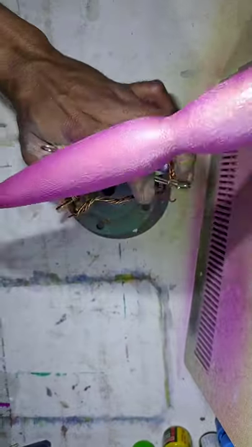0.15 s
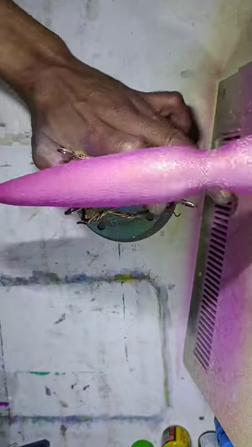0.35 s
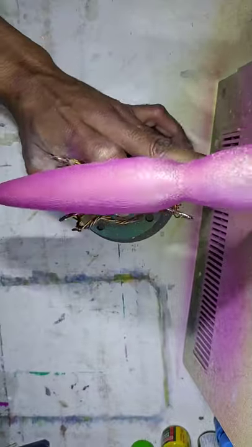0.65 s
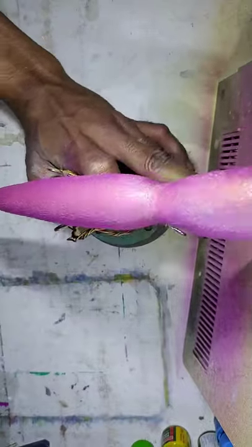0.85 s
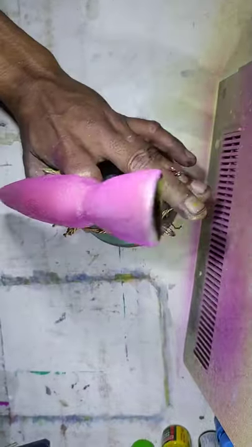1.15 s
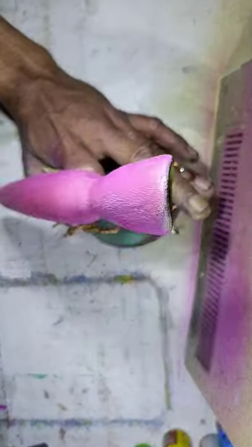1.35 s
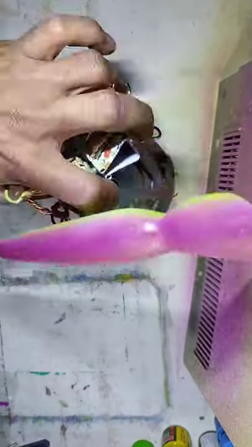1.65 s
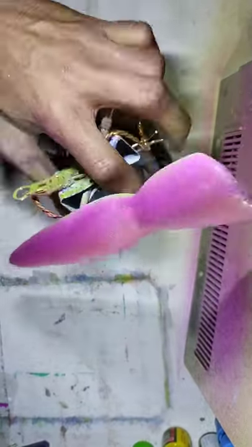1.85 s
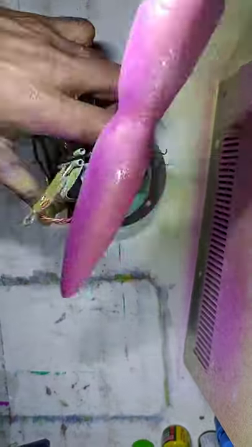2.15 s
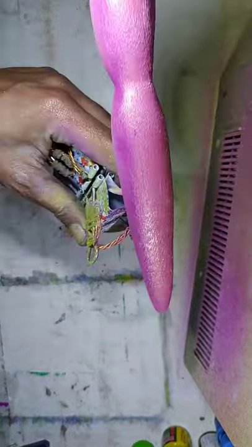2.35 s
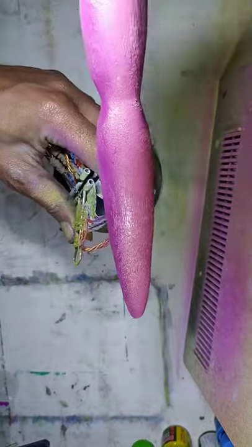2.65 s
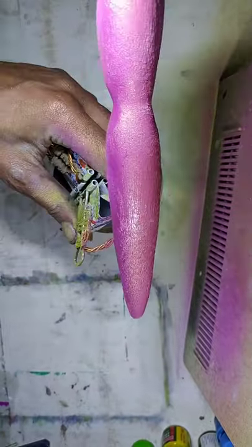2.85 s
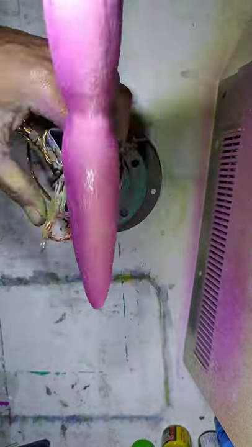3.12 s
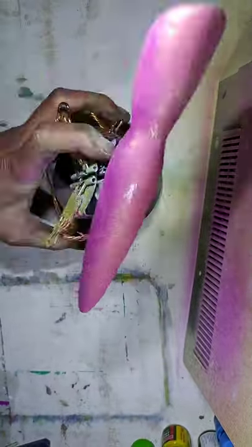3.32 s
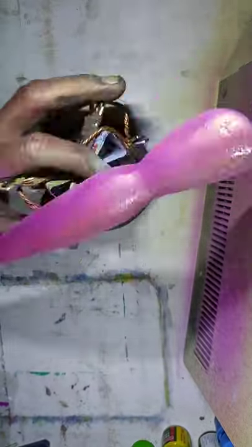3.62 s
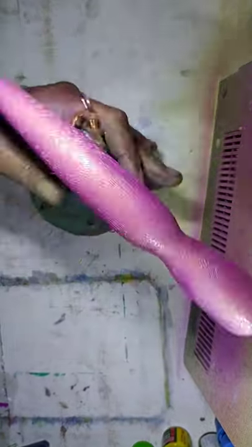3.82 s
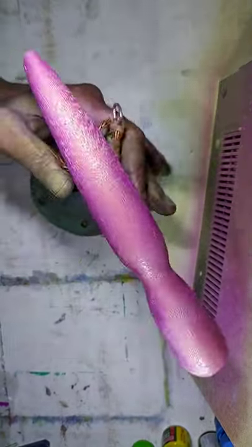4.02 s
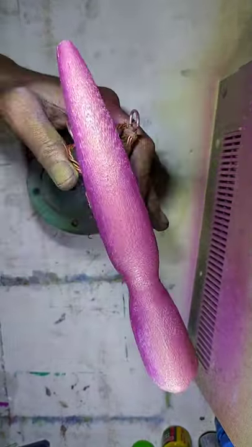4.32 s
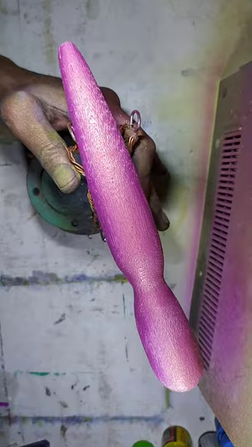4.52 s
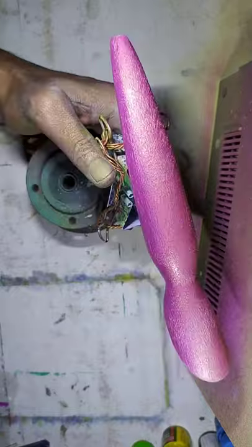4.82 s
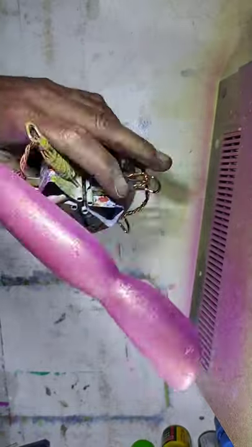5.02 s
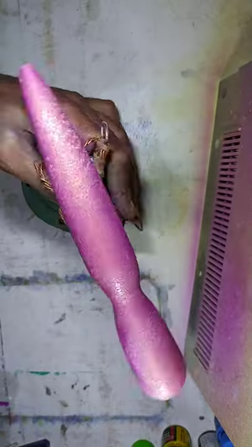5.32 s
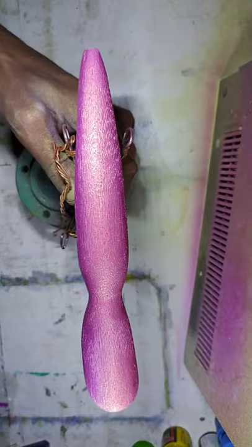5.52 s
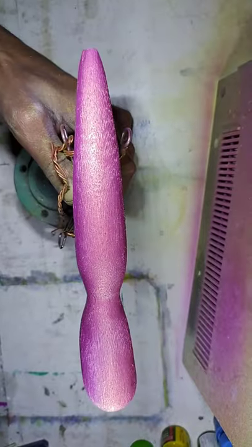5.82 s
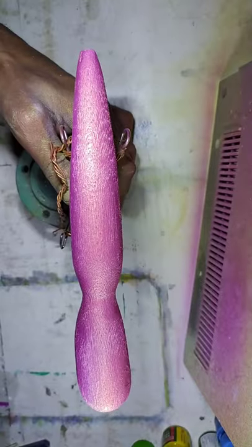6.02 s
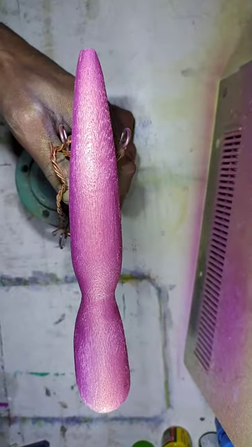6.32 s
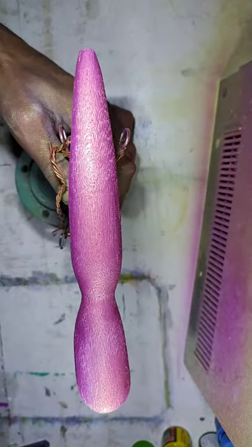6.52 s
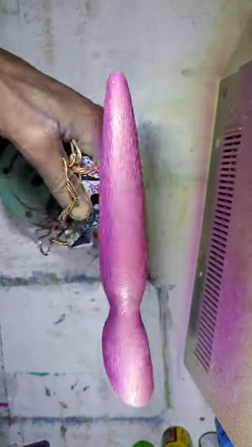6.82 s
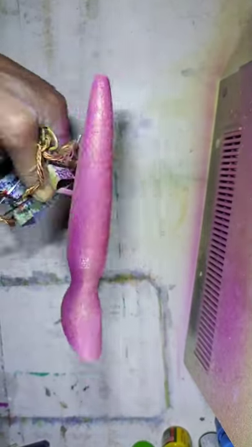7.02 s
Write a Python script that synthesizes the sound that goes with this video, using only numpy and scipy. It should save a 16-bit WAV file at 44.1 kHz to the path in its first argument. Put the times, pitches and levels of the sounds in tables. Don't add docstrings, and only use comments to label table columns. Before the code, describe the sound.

Bright bursts of spraying paint hiss near the left, above hurried compressor thuds and fan noise, then stop as a stand keeps scraping on the bench.

```python
import sys
import numpy as np
from scipy import signal
from scipy.fft import rfft, irfft, next_fast_len
from scipy.io import wavfile
from scipy.ndimage import uniform_filter1d

SR = 44100
rng = np.random.default_rng(int(sys.argv[2]) if len(sys.argv) > 2 else 0)


def voltage_ratio(level):
    return 10 ** (np.asarray(level, float) / 20)


def wrap_up_sound(samples):
    columns = np.atleast_2d(samples).T
    tamed = np.clip(columns, -1, 1)
    steps = np.round(tamed * 32767).astype(np.int16)
    wavfile.write(sys.argv[1], SR, steps)


N = 315756

CYCLE_S, STROKE_S, VALVE_S = .08571, 0, .0664
PORT_LAG = 16
# frequency in Hz, left minus right in dB.
ROOM_BALANCE = [(60, 0.5), (200, -1.5), (700, 1.5), (1300, 2.5), (2400, 0.5), (4400, 3), (9500, 22),
                (15000, 76)]


def shape(x, points):
    hz, db = np.transpose(points)
    size = next_fast_len(x.shape[-1], real=True)
    bins_hz = np.arange(size // 2 + 1) * SR / size
    gain = voltage_ratio(np.interp(np.log(bins_hz + 1), np.log(hz), db))
    return irfft(rfft(x, size) * gain, size)[..., :x.shape[-1]]


def level(x, db):
    return x * voltage_ratio(db) / np.sqrt(np.mean(np.atleast_2d(x).mean(axis=0) ** 2))


def walk(rate):
    hold = int(SR / rate)
    steps = np.repeat(rng.standard_normal(N // hold + 1), hold)
    return 1.923 * uniform_filter1d(uniform_filter1d(steps, hold), hold)[:N]


def ports(x, balance):
    hz, db = np.transpose(balance)
    return np.array([x[0], shape(x[1], np.transpose([hz, -db]))])


def ring(hz, t60, length):
    t = np.arange(int(length * SR)) / SR
    return np.sin(2 * np.pi * hz * t) * np.exp(-np.log(1000) * t / t60)


def add(out, s, x):
    i = max(int(s * SR), 0)
    out[:, i:i + x.shape[-1]] += x[..., :N - i]


def air(points, alike_hz, sway_db, flicker_db):
    shared, *own = rng.standard_normal((3, N))
    share = [(alike_hz / 4, 0), (alike_hz, -3), (4 * alike_hz, -24)]
    apart = [(alike_hz / 16, -7), (alike_hz, -3), (2 * alike_hz, 0)]
    x = shape(np.array([np.roll(shared, PORT_LAG), shared]), share) + shape(np.array(own), apart)
    size = next_fast_len(N, real=True)
    bins_hz = np.arange(size // 2 + 1) * SR / size + 1
    spectrum = rfft(shape(x, points), size)
    out, sway = 0, walk(2.62)
    centres = 30 * 2. ** np.arange(10)
    for hz in centres[centres > points[0][0] / 2]:
        weight = np.clip(1 - abs(np.log2(bins_hz / hz)), 0, 1)
        band = irfft(spectrum * weight, size)[:, :N]
        out = out + band * voltage_ratio(sway_db * sway + flicker_db * walk(40))
    return out


def dropouts(x, size=2048):
    # frequency in Hz, depth in dB.
    depths = [(700, 1), (1500, 5), (3000, 8), (5500, 8), (7500, 4), (9500, 2), (12000, 5), (15500, 7)]
    hz, _, cells = signal.stft(x, SR, nperseg=size)
    depth_db = np.interp(hz, *np.transpose(depths))[:, None]
    fine, wide = rng.standard_normal((2,) + cells.shape[-2:])
    wide = wide[::6, ::2].repeat(6, axis=0).repeat(2, axis=1)[:len(hz), :cells.shape[-1]]
    gain = voltage_ratio(depth_db * (1.1 * np.minimum(fine, .7) - 4 * np.clip(wide - 1.1, 0, 1)))
    gain = gain / np.sqrt(uniform_filter1d(np.mean(gain ** 2, axis=1), size=41))[:, None]
    return signal.istft(cells * gain, SR, nperseg=size)[1][..., :N]


def spray():
    # frequency in Hz, density in dB per Hz.
    jet_colour = [(2350, -24.5), (3500, -19), (4200, -16.5), (5320, -15), (6900, -8), (8100, -5.5),
                  (9170, 1), (10000, 1.5), (12100, -8), (15300, -14.5), (15900, -9)]
    # frequency in Hz, density in dB per Hz.
    wash_colour = [(120, -1), (250, 10), (500, 1), (900, -4.5), (1500, -7.5), (2700, -3.5), (4000, -7.5),
                   (6000, -1.5), (9000, -40)]
    # frequency in Hz, left minus right in dB.
    near_balance = [(300, 4.5), (1300, -2.5), (2400, 0.5), (4400, 4), (6500, 15), (9500, 25), (12000, 105),
                    (16000, 64)]
    # opens, fullest and let go in seconds, fullest and last level in dB.
    pulls = [
        (-.1, .05, .097, -28.5, -28.5),
        (.74, 1.0, 1.187, -27, -28.5),
        (1.231, 1.368, 1.446, -27.5, -28.5),
        (2.424, 2.457, 2.75, -28.5, -32.5),
        (2.879, 3.016, 3.024, -28, -29),
        (3.932, 4.19, 4.204, -26.5, -27.5),
        (4.246, 4.272, 4.533, -26, -33),
        (4.551, 4.706, 4.718, -26.5, -27),
        (4.747, 4.785, 4.9, -30, -36.5),
    ]
    # leak in seconds, leak in dB, attack and drop in seconds.
    valves = [
        (.004, -48, .013, .016),
        (.004, -47, .013, .017),
        (.014, -47, .012, .016),
        (.002, -50, .014, .016),
        (.013, -46, .014, .016),
        (.003, -48, .012, .018),
        (.012, -43, .015, .016),
        (.004, -49, .012, .011),
        (.002, -57, .003, .016),
    ]
    # time in seconds, wash level in dB.
    aim = [(0, -39), (.8, -47.5), (.975, -39.5), (1.05, -43), (1.2, -43.5), (1.45, -46), (2.5, -50),
           (2.74, -42.5), (2.9, -47.5), (4.0, -51), (4.3, -44.5), (4.6, -47.5), (4.9, -46.5)]
    seep_s, seep_db, open_db = .008, -62, -33
    early_share, early_gain_share = .25, .45
    dribble_db, shut_db, shut_s, wash_release_s = -24, -33, .008, .028

    t, jet_gain, flowing = np.arange(N) / SR, 0, 0
    for (on, full, off, full_db, last_db), (leak, leak_db, attack, drop) in zip(pulls, valves):
        early = on + attack + early_share * (full - on - attack)
        early_db = open_db + early_gain_share * (full_db - open_db)
        times = [on - leak - seep_s, on - leak, on, on + attack, early,
                 full, off, off + drop, off + drop + shut_s]
        levels = [seep_db, leak_db, leak_db - 0.5, open_db, early_db,
                  full_db, last_db, last_db + dribble_db, last_db + shut_db]
        jet_gain = jet_gain + voltage_ratio(np.interp(t, times, levels, -120, -120))
        times = [on, on + attack, off, off + wash_release_s]
        flowing = flowing + voltage_ratio(np.interp(t, times, [-11.0, 0.0, 1, -13], -90, -90))
    wash_gain = flowing * voltage_ratio(np.interp(t, *np.transpose(aim)))
    sputter = voltage_ratio(0.4 * walk(300) + 0.6 * walk(80))
    jet, wash = dropouts(np.array([air(jet_colour, 300., 0.21, 0.87), air(wash_colour, 530.0, 0.72, 1.5)]))
    jet = level(ports(jet, near_balance), 0.095) * jet_gain * sputter
    wash = level(ports(wash, near_balance), 1.78) * wash_gain
    return jet + wash


def fan():
    # frequency in Hz, density in dB per Hz.
    rush = [(25, -4.5), (45, -7), (90, -12.5), (130, -9.5), (180, -5), (220, -8.5), (350, -7), (460, -12.5),
            (750, -11.5), (1000, -16.5), (1350, -14.5), (1600, -23), (2900, -26), (4100, -34.5),
            (4800, -30.5),
            (6500, -27.5), (9100, -26.0), (9550, -20.5), (10000, -23.0), (11500, -31.5),
           (13500, -42.0), (15800, -44.0)]
    # time in seconds, low drone in dB, high drone in dB.
    swells = [
        (0, -58, -48),
        (2.3, -56.5, -68),
        (3.7, -52.5, -58),
        (4.4, -60, -76),
        (5.4, -58, -53),
        (6.0, -50, -50.5),
        (6.8, -50.5, -43.5),
        (7.16, -48, -46),
    ]
    out = level(ports(dropouts(air(rush, 750.0, 0.15, 1.1)), ROOM_BALANCE), -47)
    s, *levels = np.transpose(swells)
    for hz, db in zip((91, 346), levels):
        drone = np.sin(2 * np.pi * np.cumsum(hz + 7 * walk(25)) / SR)
        out = out + drone * voltage_ratio(np.interp(np.arange(N) / SR, s, db) + 0.8 * walk(8.4))
    return out


def slices():
    # first stroke in seconds, gap, next gap and step back in ms (-1 is a hiccup).
    gait = [(.011, 55.8, 55.8, 16), (.2667, 71.8, 67.7, 16), (.72, 80.5, 68, 0), (1.177, 43, 94, 16),
            (1.383, 76, 43.5, 0), (1.653, 82, 69, -1), (1.874, 70, 88, -1), (2.0945, 55.5, 102, 16),
            (2.378, 81, 102, 16), (2.637, 64.6, 66.4, 0), (2.8236, 76, 91.5, 16), (3.05, 86, 55, 0),
            (3.191, 71.5, 71.5, 16), (3.426, 74.2, 74.2, 0), (3.6356, 94, 55.5, 0), (3.864, 100, 61, 0),
            (4.106, 90, 43, 0), (4.239, 78, 102, 14), (4.468, 71, 97, 16), (4.688, 84, 73, 0),
            (4.902, 71, 82.5, -1), (5.195, 75.5, 61, 12), (5.3315, 71.7, 71.7, 16), (5.573, 55, 71, 0),
            (5.785, 82, 70, -1), (6.004, 67, 86, 0), (6.243, 74, 55, 0), (6.4585, 61, 97.5, 12),
            (6.672, 75, 89, 0), (6.903, 87, 55, 0)]
    # stroke in seconds, step back in ms.
    stumbles = [(.339, 13), (.478, 1), (.72, -12), (1.314, 1), (1.383, 0), (1.502, 17), (2.378, 0),
                (2.561, -11), (2.637, -1), (2.702, 16), (2.9, 19), (2.991, 16), (3.785, 12), (4.106, -6),
                (4.239, 16), (4.317, 12), (4.636, -2), (4.688, -4), (4.772, 13), (5.271, -12), (5.475, 13),
                (5.628, 16), (5.937, 12), (6.004, 0), (6.519, 11)]
    # ms before the next stroke, place in the cycle in ms.
    hiccup = [
        (43, 52),
        (31.5, 23.5),
    ]
    hiccup_gap_ms = 68
    lead_ms, cut_ms, short_ms, closest_ms = 14.7, 16, 60, 40

    cycle_ms, end_ms, strokes = CYCLE_S * 1000, N / SR * 1000, []
    run_ends = [row[0] for row in gait[1:]] + [N / SR]
    for (s, *gaps, back), end in zip(gait, run_ends):
        times_ms = s * 1000 + np.cumsum([0] + gaps * 4)
        strokes += [(ms, back) for ms in times_ms if ms < end * 1000 - closest_ms]
    out = []
    for (ms, back), (after, _) in zip(strokes, strokes[1:] + [(end_ms, 0)]):
        gap = after - ms
        out.append((ms - lead_ms, cycle_ms - lead_ms))
        own = [step for s, step in stumbles if abs(s * 1000 - ms) < 2]
        if own:
            out.append((ms + cut_ms, cut_ms - own[0]))
        elif gap > short_ms and back > 0:
            out.append((ms + cut_ms, cut_ms - back))
        elif back < 0 and hiccup_gap_ms < gap < cycle_ms:
            out += [(after - before, place) for before, place in hiccup]
        elif short_ms < gap < cycle_ms:
            out.append((ms + cut_ms, cycle_ms - gap + cut_ms))
    return [(max(ms, 0) / 1000, place - min(ms, 0)) for ms, place in out]


def compressor(count=24):
    # frequency in Hz, t60 in seconds, signed swing left and right.
    casing = [(92, 0.23, 1, 1), (121, 0.13, 4.5, 3.5), (162.92, 0.38, -9, -8), (173.96, 0.21, 34, 37.5),
              (196, 0.26, 1, 0.5), (232.5, 0.51, 0, 7.5), (254.76, 0.28, -11, -22.5),
              (284.6, 0.26, -4.5, -17.5), (315, 0.12, -20.5, -21), (361.6, 0.4, -6.5, -5),
              (383.8, 0.14, -16.5, -11), (420, 0.51, -2, -1.5), (468, 0.022, -17, -30),
              (527.2, 0.12, 0, -8.5), (553.5, 0.095, -12, -13.5), (571, 0.095, -3.5, 2.5),
              (597.4, 0.48, -2.5, -2), (616.4, 0.12, -2, -1), (674, 0.11, 3, 3.5), (728, 0.038, 9, -2),
              (755.5, 0.085, -0.5, 6.5), (845, 0.55, 1.5, 2), (648, 0.019, -12, -9.5),
              (770, 0.031, -7, -6.5), (1160, .02, 4, 10.5)]
    # start in seconds, signed push, treble tilt as a power of frequency.
    blow_kinds = [
        (STROKE_S, 1, 0),
        (.0269, -.155, -.33),
        (VALVE_S, .39, -.33),
    ]
    rattle_colour = [(480, -21), (555, 19.5), (620, -9), (760, 2.0), (950, -10), (1350, 6.5),
                     (1550, 0.0), (2550, -11.5), (2900, 3.5), (3300, -20.0), (6000, -59)]

    size, t = int(count * CYCLE_S * SR), np.arange(int(.35 * SR)) / SR
    chance, thud, strokes = rng.standard_normal((count, 3)), 0, 0
    for k, (start, push, tilt) in enumerate(blow_kinds):
        blows = np.zeros(size)
        places = ((np.arange(count) * CYCLE_S + start) * SR).astype(int)
        blows[places] = push * voltage_ratio(0.35 * chance[:, k])
        body = 0
        for hz, t60, left, right in casing:
            build = 1 - np.exp(-t / .0021 * (hz / 300) ** .34)
            mode = ring(hz, t60, .35) * (hz / 300) ** tilt * build
            body = body + np.outer([left, right], mode)
        thud = thud + signal.fftconvolve(blows[None], body * voltage_ratio(-60.0), axes=1)[:, :size]
        strokes = strokes + abs(blows)

    shake = np.exp(-t / 0.041) * (1 - np.exp(-t / 0.0031))
    gate = 0.15 + signal.fftconvolve(strokes, shake)[:size]
    bursts_db = 6.5 * rng.standard_normal(size // 200 + 1).repeat(200)[:size]
    grit = rng.standard_normal(size) * voltage_ratio(bursts_db)
    run = thud + level(gate * shape(grit, rattle_colour), -58.5)
    run[0] = np.roll(run[0], PORT_LAG)

    out, fade = np.zeros((2, N)), int(0.0041 * SR)
    cuts = slices()
    ends = [s for s, _ in cuts[1:]] + [N / SR]
    for k, ((s, ms), end) in enumerate(zip(cuts, ends)):
        length = int(end * SR) - int(s * SR) + fade
        i = int(((4 + k % (count - 8)) * CYCLE_S + ms / 1000) * SR)
        edge = np.clip(np.minimum(np.arange(length), length - np.arange(length)) / fade, 0, 1)
        add(out, s, run[:, i:i + length] * edge)
    return out


def scrapes():
    # time in seconds, length in seconds, ring in Hz, ring level in dB, grit level in dB.
    drags = [(0.153, 0.08, 900, -44, -55), (0.281, 0.056, 462, -39, -45), (0.292, 0.039, 1100, -37, -58),
             (0.768, 0.061, 1140, -35, -47), (0.816, 0.057, 756, -36.5, -41), (0.897, .07, 545, -43, -43),
             (0.966, 0.032, 1340, -48, -46), (1.313, 0.035, 1180, -36, -40), (1.634, 0.06, 406, -34, -42),
             (2.023, 0.041, 454, -34.5, -43), (2.043, .025, 562, -38, -46), (2.247, 0.035, 423, -36, -58),
             (2.263, .03, 690, -39, -43.5), (2.692, 0.037, 585, -47, -45), (3.406, .08, 439, -32, -43.5),
             (3.433, 0.037, 1090, -39, -41.5), (3.378, 0.02, 780, -47, -54), (3.77, 0.048, 425, -36, -45),
             (4.878, 0.049, 1120, -35, -41.5), (4.937, 0.051, 507, -39.5, -41),
             (5.365, 0.055, 1180, -42, -55), (5.799, 0.046, 1300, -56, -46),
             (5.868, 0.037, 1120, -36.5, -62), (6.248, 0.043, 1170, -52, -45),
             (6.403, 0.041, 1215, -37, -53), (6.533, 0.027, 1300, -47, -52), (6.681, 0.035, 1190, -41, -63),
             (6.867, 0.066, 454, -35.5, -42), (6.895, 0.029, 840, -42, -43)]
    grit_colour = [(150, -2), (400, -7), (700, 11.5), (1200, 5.5), (3000, -9.0), (8000, -13.0), (14000, -24)]
    far_hz, far_lag, far_db = 650, 12, -4
    out = np.zeros((2, N))
    for s, length, hz, ring_db, grit_db in drags:
        size = int(1.6 * length * SR)
        slips_db = 3.7 * rng.standard_normal(100).repeat(80)[:size]
        slips = rng.standard_normal((2, 6000))[:, :size] * voltage_ratio(slips_db)
        peak = signal.iirpeak(hz, 7, SR)
        tone = signal.lfilter(*peak, signal.lfilter(*peak, slips[0]))
        tone = np.array([np.roll(tone, far_lag * (hz > 1.5 * far_hz)), tone]) * np.hanning(size)
        tone = tone * voltage_ratio(ring_db - 8 + far_db * (hz > far_hz)) / tone.std()
        grit = shape(slips + 0.21 * slips[::-1], grit_colour)
        grit = level(grit, grit_db - 5) * np.hanning(size)
        add(out, s - .8 * length, ports(tone + grit, ROOM_BALANCE))
    return out


def ticks():
    # time in seconds, peak in dB, left minus right in dB.
    hooks = [(0.3625, -38.5, -10), (0.5686, -44, -9), (0.594, -45, -5.0), (0.622, -43, -7),
             (0.711, -41.5, -10), (1.9445, -41, -4), (2.3211, -42.5, -3), (2.408, -40, -2.0),
             (3.1343, -49, -2.5), (3.5992, -41, -6), (3.6144, -48, 1.0), (3.8428, -37, -7),
             (5.3318, -43, -1.0), (5.4241, -41, -15), (5.4334, -39, -1.0), (5.6391, -42.5, -1.5),
             (5.8192, -42, 6), (5.9165, -46, -2.0), (5.9574, -46, -5), (6.2582, -40, -1.0),
             (6.6518, -41, -5), (6.6807, -39.5, -5)]
    out = np.zeros((2, N))
    onset = np.clip(np.arange(int(.05 * SR)) / 40, 0, 1)
    for s, db, pan_db in hooks:
        hz = 2900 * (1 + 0.017 * rng.standard_normal())
        sides = voltage_ratio([db + pan_db / 2, db - pan_db / 2])
        add(out, s, np.outer(sides, ring(hz, 0.017, .05) * onset))
    return out


def knocks():
    # time in seconds, peak in dB.
    hits = [
        (1.613, -28),
        (2.256, -37),
        (3.4286, -24.5),
        (4.9479, -23),
    ]
    out = np.zeros((2, N))
    onset = np.clip(np.arange(int(.05 * SR)) / 25, 0, 1)
    for s, db in hits:
        knock = 0.82 * ring(433, 0.032, .05) + 0.26 * ring(1230, 0.017, .05)
        add(out, s, voltage_ratio(db) * knock * onset)
    return out


def rustles():
    # time in seconds, length in seconds, level in dB.
    strokes = [
        (3.375, 0.061, -52),
        (3.542, 0.045, -57),
        (3.718, .015, -62),
        (5.716, 0.024, -67),
        (6.36, .03, -63),
        (6.87, .09, -55),
    ]
    out = np.zeros((2, N))
    for s, length, db in strokes:
        size = int(1.5 * length * SR)
        cloth = shape(rng.standard_normal((2, 8000)), [(2000, -10), (6000, -6), (10000, 4), (15000, -11)])
        cloth = level(cloth[:, :size], db) * np.hanning(size)
        add(out, s - 0.69 * length, ports(cloth, ROOM_BALANCE))
    return out


def squeak():
    out = np.zeros((2, N))
    tone = ring(1630, 0.33, .085) * np.hanning(int(.085 * SR))
    add(out, 4.965, np.outer(voltage_ratio([-41, -60]), tone))
    return out


def scene():
    stand = scrapes() + ticks() + knocks() + squeak()
    return spray() + fan() + compressor() + stand + rustles()


def roll_off(x):
    return signal.sosfilt(signal.butter(12, 15920, fs=SR, output="sos"), x)


def record(dry):
    mix = shape(dry, [(15860, 0), (15930, -70)])
    return roll_off(mix)


dry = scene()
out = record(dry)
wrap_up_sound(out)
```